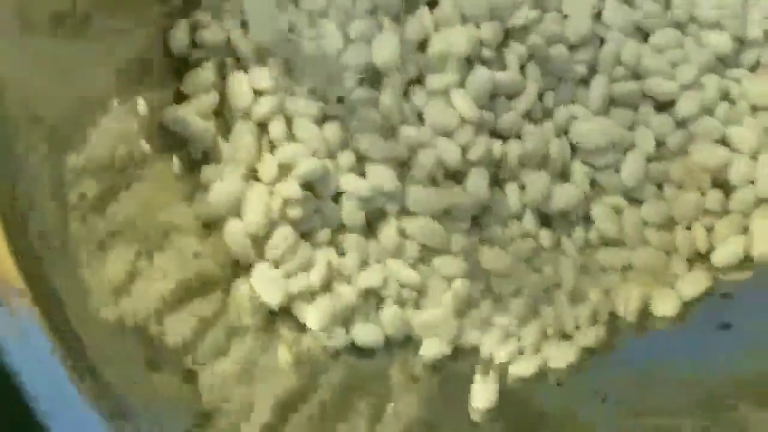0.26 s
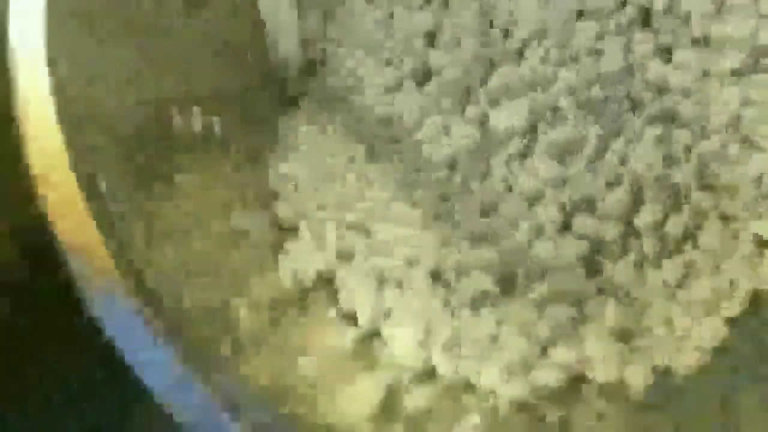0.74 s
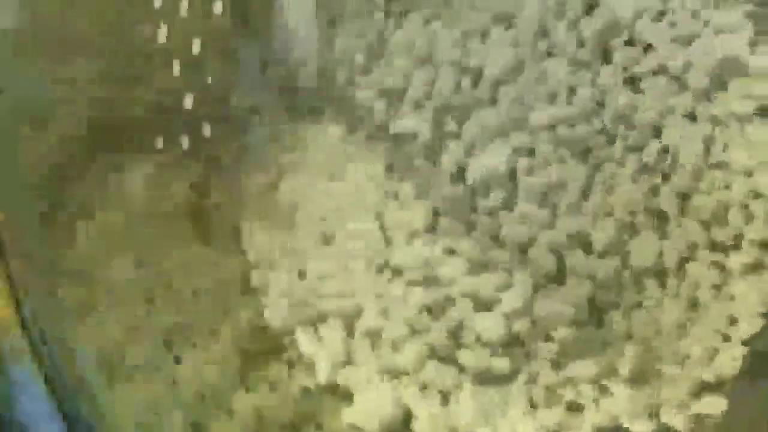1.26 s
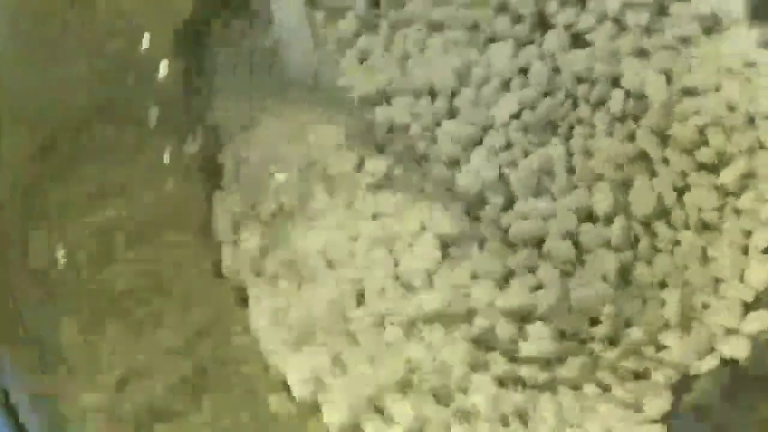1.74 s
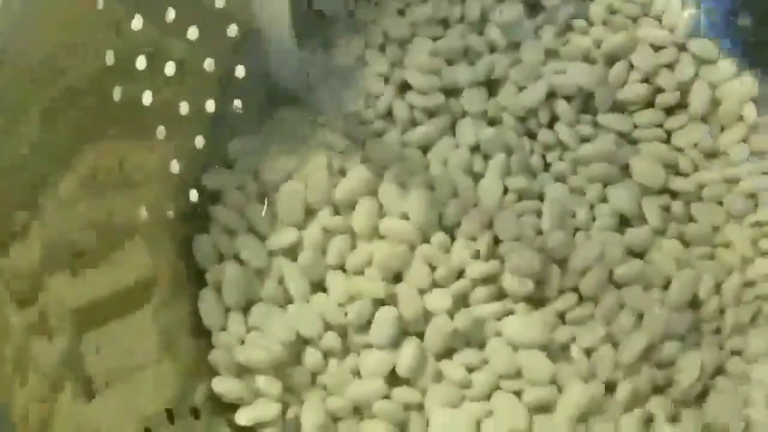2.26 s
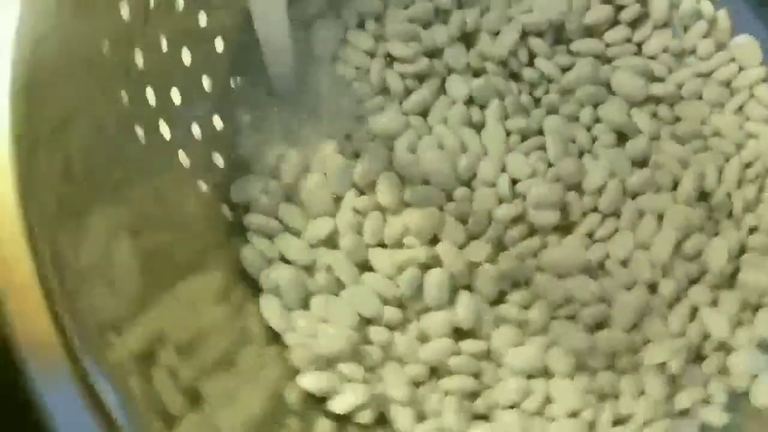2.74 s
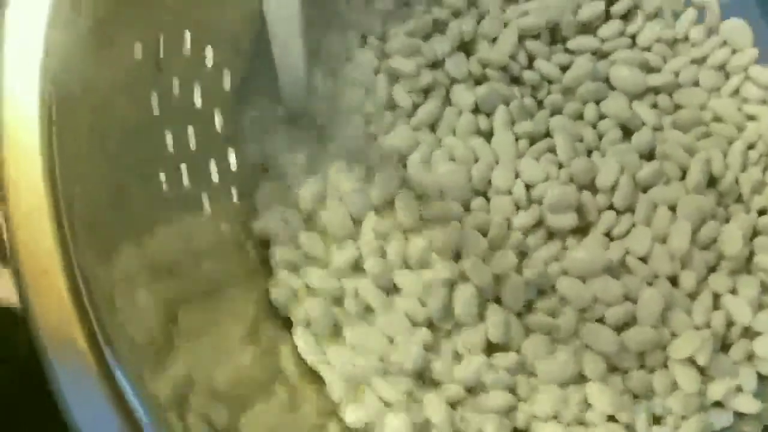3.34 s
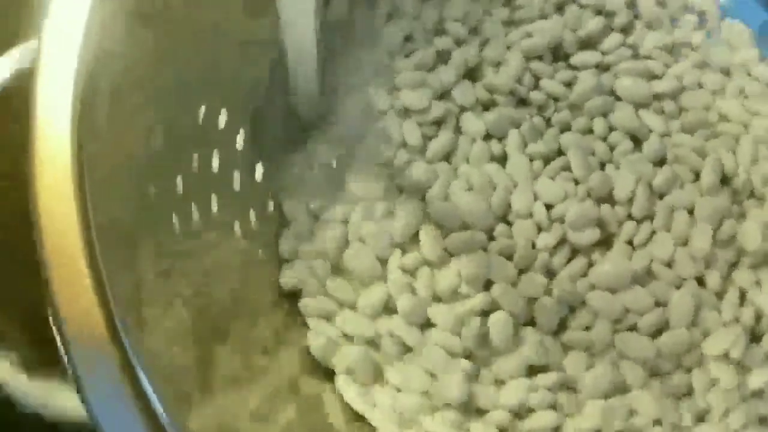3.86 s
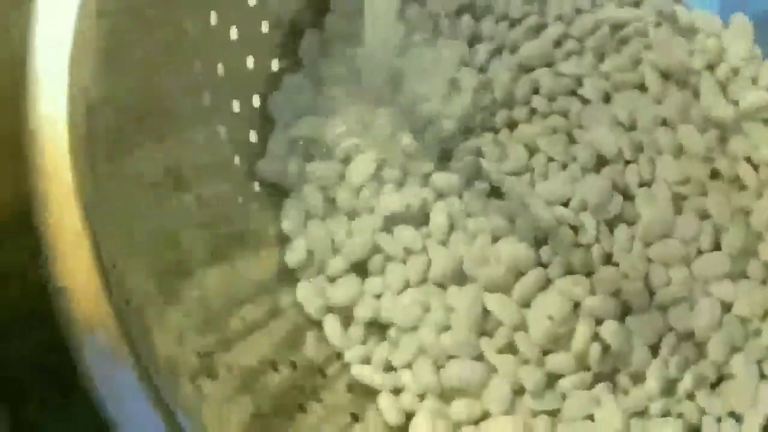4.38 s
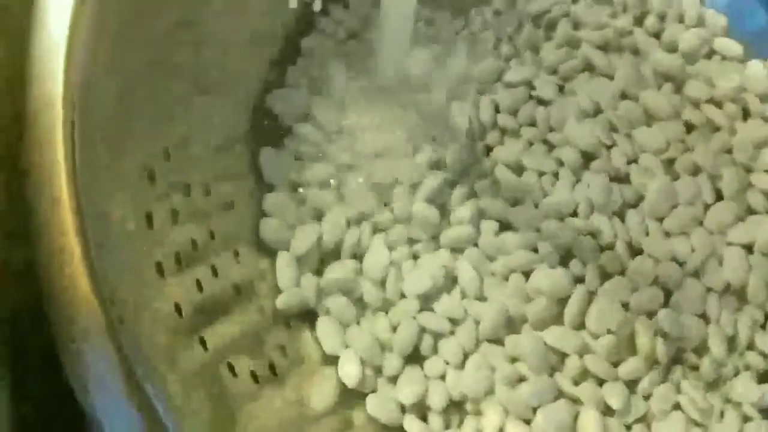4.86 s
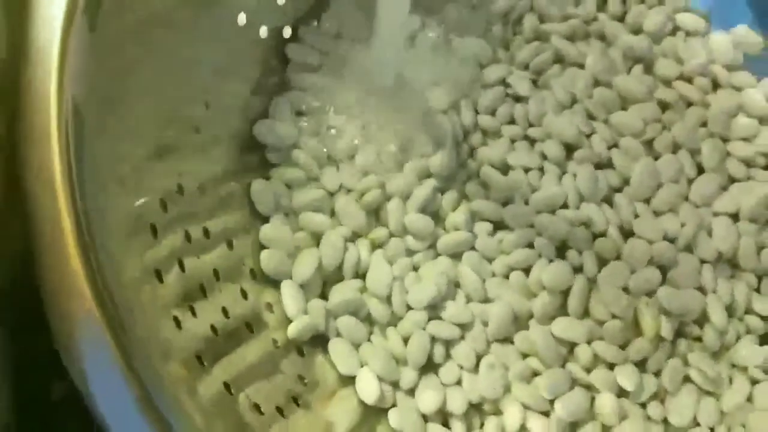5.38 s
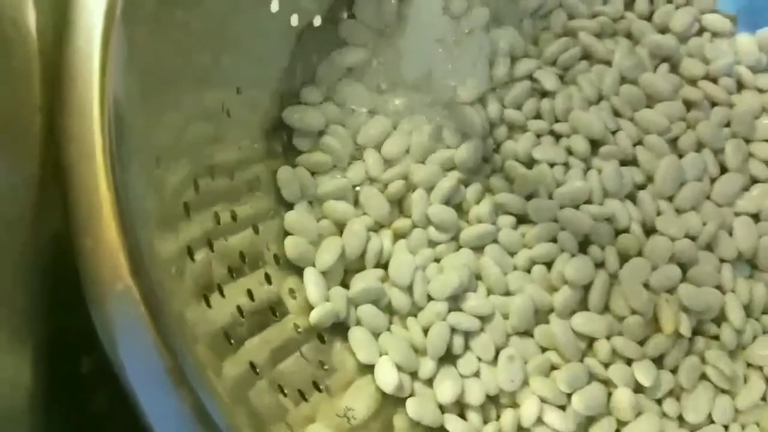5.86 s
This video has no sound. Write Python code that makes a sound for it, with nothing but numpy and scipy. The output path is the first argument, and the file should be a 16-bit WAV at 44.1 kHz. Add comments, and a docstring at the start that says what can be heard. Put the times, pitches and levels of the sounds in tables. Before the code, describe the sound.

Water runs without stopping, bright and fizzy, gurgling among beans and drumming faintly on a steel basin below. The colander is first jolted four times, thudding and ringing dully as beans rattle, then scraped round in a quick stuttering bump. Lighter taps and another brief groan follow, with small low plops and one clear late knock. Close stereo pickup in a small, slightly reverberant kitchen.

```python
"""Tap water runs onto dried beans in a steel colander held over a kitchen sink, close to the microphones.
From the start, droplet impacts, ringing bubbles and noise make the jet; run-off drums on basin modes.
Then the colander is shaken four times: its bumps excite modes of sink, foot and wall and rattle the beans.
Sliding beans are swishes of clicks, and short low plops are tones of a few cycles with rising pitch.
Later the colander is dragged round: knocks mingle with stick-slip judders of its foot as the water runs on."""
import sys
import numpy as np
from scipy import signal
from scipy.fft import rfft, irfft
from scipy.io import wavfile
from scipy.ndimage import uniform_filter1d

SR = 44100
rng = np.random.default_rng(int(sys.argv[2]) if len(sys.argv) > 2 else 0)


def to_wav(s):
    """Save 16-bit WAV."""
    ch = np.atleast_2d(s).T  # columns
    pcm = np.round(np.clip(ch, -1, 1) * 32767)  # PCM
    wavfile.write(sys.argv[1], SR, pcm.astype(np.int16))


N = 269892
TIME = np.arange(N) / SR
HZ = np.fft.rfftfreq(N, 1 / SR)

# The jet on the beans, quietest while the colander is tipped away.
# Each row: time in seconds, splash level in dB, fine spray level in dB.
JET_LEVELS = [(0.0, -33, -35), (0.6, -32, -35.5), (0.82, -31, -36.5), (0.95, -30, -36), (1.08, -32.5, -36),
              (1.5, -34, -38.5), (1.72, -33.5, -37.5), (1.88, -36, -41), (2.12, -35.5, -39),
              (2.38, -33, -36.5), (2.75, -33.5, -36.5), (2.921, -34.5, -38.5), (3.45, -34, -38),
              (3.85, -31, -36), (4.25, -31.5, -36), (4.6, -33.5, -33), (4.78, -34.5, -34.5),
              (5.25, -34.5, -36.5), (6.11, -32.5, -37)]
# Spectral colour of the running water. Each row: frequency in Hz, relative density in dB per Hz.
WATER_COLOUR = [(40, -21), (100, -15), (330, -10), (470, -22), (1100, -21.5), (1900, -6), (2300, -6),
                (2650, -3.5), (3600, -4), (6500, 0), (8700, 1), (10500, 8), (12800, 10), (14000, 7),
                (15000, 6), (15700, 6)]
# Air resonances of the bowl and its holes, added to that colour.
# Each row: frequency in Hz, width in Hz, height in dB.
BOWL_RESONANCES = [(455, 54, -6), (581, 110, 9), (680, 74, -11.5), (786, 49, 4.5), (960, 47, 5.5),
                   (1410, 31, 6.5), (1316, 42, 10), (1683, 45, 7), (2160, 130, 3), (3090, 130, 5),
                   (3555, 520, 4.5), (4130, 190, 3.5), (11700, 400, 3), (13140, 3700, 7.5)]
# Water welling between the beans, fuller once the jet has dug a pool.
# Each row: time in seconds, mean level in dB.
GURGLE_LEVELS = [(0.0, -50), (0.6, -50), (1.3, -47), (1.9, -50), (2.4, -48.5), (3.5, -47), (4.2, -45),
                 (6.11, -47)]
# The jet wanders across the bowl. Each row: time in seconds, left minus right in dB.
JET_PAN = [(0.0, -1.2), (0.8, -0.5), (1.7, 0.3), (2.7, 1.5), (3.7, 0.5), (4.25, -0.5), (4.7, -1.5),
           (5.25, 0.2), (6.11, -2.2)]
# The jet sings on the steel when it strikes the wall beside the heap.
# Each row: time in seconds, mean level in dB.
WALL_SING_LEVELS = [(0.0, -47), (0.95, -44.5), (1.5, -57.5), (2.3, -44.5), (2.8, -45), (3.3, -40.5),
                    (3.9, -48), (4.4, -51), (6.11, -50)]
# Resonances of that singing. Each row: frequency in Hz, width in Hz, relative level in dB.
WALL_SING_PEAKS = [(3200, 210, -8), (3463, 170, 1), (3760, 110, 2.5), (3990, 58, 5)]
# The froth sizzles higher once the jet stays in its pool. Each row: time in seconds, mean level in dB.
SIZZLE_LEVELS = [(0.0, -53), (1.5, -66), (3.0, -48), (4.3, -48), (4.8, -41), (5.3, -40.5), (6.11, -41)]
# Resonances of the sizzle. Each row: frequency in Hz, width in Hz, relative level in dB.
SIZZLE_PEAKS = [(11400, 300, -11), (12260, 580, 7), (12500, 640, 7)]
# Modes of the steel sink with the colander on it.
# Each row: frequency in Hz, relative level in dB, decay by 60 dB in seconds.
SINK_MODES = [(90, -7, 0.048), (120.6, 1, 0.17), (175, -9.5, 0.19), (188.2, -8.5, 0.31),
              (258.7, -3.5, 0.18), (315.3, -3, 0.19), (329, -12.5, 0.53), (355, -30, 0.39),
              (401, -16, 0.43), (558, -23.5, 0.34), (601, -16, 0.11), (640, -12.5, 0.14), (742, -10, 0.17),
              (874, -15, 0.15), (1117, -21, 0.22), (1205, -17, 0.075), (1310, -8.5, 0.09),
              (1610, -18.5, 0.15), (1803, -20, 0.09), (2150, -10.5, 0.079), (2410, -16, 0.11)]
# Brief level dips between about 400 and 1400 Hz.
# Each row: time of the deepest point in seconds, half length in seconds, change in dB.
LEVEL_DIPS = [(0.348, 0.04, -12), (0.91, 0.018, -12), (1.385, 0.018, -11), (1.462, 0.025, -14),
              (3.87, 0.064, -28), (4.068, 0.014, -9), (5.995, 0.035, -8)]
# The colander bumps the sink. Each row: start in seconds, thud drive in dB, contact hardness (low-pass
# edge) in Hz, ring pitch of the foot in Hz, ring drive in dB, drive of the wall's clink in dB.
KNOCKS = [(0.729, -14.5, 2800, 319, -16, -24), (1.007, -15.5, 1700, 324, -19, -43),
          (1.017, -27, 500, 344, -18, -41), (1.277, -14.5, 2560, 293, -47, -23),
          (1.313, -20.5, 2040, 342, -12, -36), (1.584, -20.5, 1390, 309, -25, -31),
          (1.605, -33, 1500, 590, -23, -27), (2.225, -28.5, 1170, 310, -9, -25),
          (2.333, -21, 750, 188, -32, -35), (2.351, -26, 1000, 303, -19, -36),
          (2.396, -21.5, 1300, 320, -27, -29), (2.432, -25.5, 895, 292, -25, -35),
          (2.549, -46, 600, 326, -24.5, -50), (2.602, -32, 619, 259, -19.5, -30),
          (2.804, -33.5, 383, 296, -24, -55), (2.895, -43.5, 500, 323, -37, -52),
          (3.1, -33.5, 1040, 249, -17, -25.5), (3.194, -37.5, 700, 280, -26, -32.5),
          (3.472, -42, 600, 328, -33.5, -41), (3.997, -40, 600, 398, -29, -36),
          (4.25, -37, 800, 311.5, -21.5, -36), (4.58, -43, 1200, 580, -31, -34.5),
          (4.887, -27, 1700, 305, -13.5, -20.5), (5.322, -33.5, 700, 299.5, -17.5, -29.5)]
# Modes of the colander's foot.
# Each row: multiple of its ring pitch, relative level in dB, decay by 60 dB in seconds.
FOOT_MODES = [(0.5, -1.5, 0.088), (1.001, 1, 0.11), (2.32, -10.5, 0.08)]
# Modes of the colander's thin wall, damped by wet beans.
# Each row: mean frequency in Hz, relative level in dB, decay by 60 dB in seconds.
WALL_MODES = [(1030, -9.5, 0.12), (1263, -4.5, 0.051), (1580, -19, 0.045), (1750, -6, 0.15),
              (1900, -5, 0.066), (2230, -15, 0.037), (2810, -5, 0.037), (3040, -26, 0.022),
              (3750, 1, 0.051)]
# Colour of wet beans thrown against the steel. Each row: frequency in Hz, relative density in dB per Hz.
RATTLE_COLOUR = [(30, -24), (150, 20), (600, 12), (1000, 2), (1400, 6.5), (2500, 5.5), (4000, -2),
                 (6200, 9), (8500, -6), (15000, -4)]
# Beans slide over each other and the perforated steel.
# Each row: time of the peak in seconds, half length in seconds, centre in Hz, peak level in dB.
SLIDES = [(0.753, 0.032, 5870, -27.5), (1.022, 0.025, 5530, -30.5), (1.236, 0.013, 2170, -38),
          (1.283, 0.024, 4960, -28.5), (1.315, 0.018, 5800, -28), (2.419, 0.0053, 5800, -29),
          (3.83, 0.02, 5500, -30.5), (4.608, 0.073, 5900, -32.5), (4.889, 0.012, 4460, -27),
          (5.006, 0.032, 4400, -31), (5.74, 0.015, 6000, -31.5), (5.874, 0.01, 5800, -32)]
# Short low plops: splashes ring the bowl for a few cycles.
# Each row: start in seconds, initial pitch in Hz, level in dB.
LOW_PLOPS = [(0.85, 880, -44), (4.075, 1400, -48), (4.11, 1110, -39), (4.31, 640, -41), (4.662, 564, -42.5),
             (4.824, 600, -38.5), (5.03, 588, -40)]
# The foot sticks and slips as it is dragged. Each row: start in seconds, length in seconds,
# mean slip rate at first in Hz, mean slip rate at last in Hz, drive in dB.
JUDDERS = [(2.278, 0.041, 321, 316, -33), (2.334, 0.041, 97, 200, -20), (2.348, 0.0097, 690, 640, -26),
           (2.361, 0.03, 298, 326, -16.5), (2.406, 0.03, 305, 327, -20.5), (2.455, 0.048, 273, 225, -35.5),
           (2.39, 0.008, 620, 628, -25), (4.081, 0.048, 151, 173, -32.5), (4.107, 0.0094, 516, 595, -20.5),
           (4.15, 0.048, 173, 171, -37.5), (4.256, 0.039, 302, 328, -23)]
# Difference between the microphones. Each row: frequency in Hz, left minus right in dB.
BALANCE = [(100, 1), (300, -2), (650, 1.5), (1200, -1.5), (2600, 3), (5000, 3), (9000, 0.3), (13000, 2)]

# stronger and harder bumps throw more beans: level at a 0 dB thud of RATTLE_HARD_HZ, and its slopes
RATTLE_DB, RATTLE_HARD_HZ, RATTLE_DB_PER_DB, RATTLE_DB_PER_OCTAVE = -10.5, 980, 1, 1
# each contact first shoves the basin floor: time scale, and drive against the thud
SHOVE_S, SHOVE_DB = 0.00097, -9
# linear rise and exponential fall of every judder
JUDDER_ATTACK_S, JUDDER_RELEASE_S = 0.01, 0.0075
# beans chatter against the steel while the foot judders: level against its drive, and centre
CHATTER_DB, CHATTER_HZ = -20, 800
EDGE_HZ = 15600  # upper band limit


def gain_of(db):
    """Logarithmic level: decibels become an amplitude ratio."""
    return 10 ** (np.asarray(db) / 20)


def evened(x):
    """Normalisation of mean power: scales to rms 1."""
    return x / np.sqrt(np.mean(x ** 2) + 1e-20)


def read(points):
    """Spectral interpolation: joins table points by straight lines on a log-frequency axis."""
    f, value = np.transpose(points)
    return np.interp(np.log(HZ + 1), np.log(f + 1), value)


def follow_points(points):
    """Linear interpolation: joins table points in time."""
    return np.interp(TIME, *np.transpose(points))


def shaped(x, gain):
    """Linear filtering: multiplies the spectrum of a full-length sound by a gain."""
    return irfft(rfft(x) * gain, N)


def softened(x, edge_hz):
    """Contact compliance: a soft contact leaves out the treble, as a second-order low-pass."""
    return signal.lfilter(*signal.butter(2, min(edge_hz, SR / 3), fs=SR), x)


def add(mix, s, sound):
    """Superposition: adds a sound into the mix at time s."""
    part = mix[max(round(s * SR), 0):][:len(sound)]
    part += sound[:len(part)]


def waver(rate_hz):
    """Random fluctuation: low-passed noise of rms 1, mostly slower than rate_hz."""
    return evened(shaped(rng.standard_normal(N), 1 / (1 + (HZ / rate_hz) ** 2)))


def patter(per_s, spread_db):
    """Random impact process: two channels of tiny clicks with exponentially spread levels in dB."""
    size = gain_of(spread_db * np.minimum(rng.exponential(1, (2, N)), 5))
    sign = rng.choice([-1, 1], (2, N))
    struck = rng.random((2, N)) < per_s / SR
    return evened(size * sign * struck)


def clumped(clicks, depth_db=1.5):
    """Amplitude modulation: beans strike in small bunches a few milliseconds long."""
    return clicks * gain_of(depth_db * waver(rate_hz=160))


def swish(hz, width_octaves=1.0):
    """Band-limited impact noise: many small clicks in one band."""
    band = np.exp(-(np.log2((HZ + 1) / hz) / width_octaves) ** 2)
    return evened(shaped(clumped(patter(per_s=4000, spread_db=-0.5)), band))


def sloshed(x, sway_s=0.0001, rate_hz=10):
    """Frequency modulation by varying delay: shifting water and beans make the steel's ring wander."""
    warped = TIME + sway_s * waver(rate_hz)
    return np.array([np.interp(warped, TIME, side) for side in x])


def reflections(x, t60, per_s):
    """Sparse reverberation: decaying echoes at random delays, different on each side."""
    t = TIME[:SR // 2]
    sign = rng.choice([-1, 1], (2, len(t)))
    taps = sign * (rng.random((2, len(t))) < per_s / SR) * gain_of(-60 * t / t60)
    taps = taps / np.linalg.norm(taps, axis=1, keepdims=True)
    return signal.oaconvolve(x, taps, axes=1)[:, :N]


def bubbles(low_hz, high_hz, per_s, cycles, glide, spread_db, count=32):
    """Bubble resonance: air pockets between the beans ring briefly, rising in pitch as they surface."""
    out = np.zeros((2, N))
    for hz in np.geomspace(low_hz, high_hz, count) * rng.uniform(0.94, 1.04, count):
        # age counts decay constants, each lasting the given number of cycles
        age = np.arange(int(5 * cycles / hz * SR)) * hz / (cycles * SR)
        ping = np.exp(-age) * np.sin(2 * np.pi * cycles * age * (1 + glide * age))
        rung = signal.oaconvolve(patter(per_s, spread_db), ping[None], axes=1)[:, :N]
        out += np.sqrt(hz) * evened(rung)
    return evened(out)


def patches(span_s, width_hz, size):
    """Correlated randomness: a smooth field of rms 1, frequency bins by time frames."""
    field = rng.standard_normal((size // 2 + 1, N // (size // 4) + 8))
    frames, bins = span_s * SR * 4 / size, width_hz * size / SR
    for axis, reach in ((1, frames), (0, bins)) * 2:  # averaged twice each way
        field = uniform_filter1d(field, max(round(reach), 1), axis)
    return evened(field)


def churned(x, low_db=7.0, high_db=3.0, knee_hz=1500, size=1024):
    """Time-varying filtering: as pockets fill and empty, narrow bands swell and fade, most in the bass."""
    overlap = size - size // 4
    hz, _, z = signal.stft(x, SR, nperseg=size, noverlap=overlap)
    depth = high_db + (low_db - high_db) / (1 + (hz / knee_hz) ** 4)
    field = np.minimum(patches(span_s=.03, width_hz=130, size=size), 1.4)
    swell = gain_of(depth[:, None] * field[:, :z.shape[-1]])
    swell /= np.sqrt(np.mean(swell ** 2, axis=1, keepdims=True))
    return signal.istft(z * swell, SR, nperseg=size, noverlap=overlap)[1][:, :N]


def jet(gurgle_hz=1300, spray_hz=8500):
    """Impact noise and bubble resonance: ticks, bubbles and hiss surge, coloured by the bowl."""
    s, splash_db, spray_db = np.transpose(JET_LEVELS)
    drops = patter(per_s=7000, spread_db=-0.5)
    froth = bubbles(low_hz=1207, high_hz=11900, per_s=35, cycles=7.4, glide=0.011, spread_db=2.5)
    hiss = rng.standard_normal((2, N))
    water = drops + gain_of(-10.5) * froth + gain_of(-3.5) * hiss
    # the jet lands a little to the left: a faint copy of the left reaches the right 9 samples later
    water[1, 9:] += .13 * water[0, :-9]
    # the bowl's walls echo it
    echoes = softened(reflections(water, t60=.1, per_s=3000), 2500)
    water = churned(water + gain_of(-3) * echoes)

    bowl_db = sum(db / (1 + (2 * (HZ - hz) / width) ** 2) for hz, width, db in BOWL_RESONANCES)
    colour = gain_of(read(WATER_COLOUR) + bowl_db)
    low = 1 / (1 + (HZ / gurgle_hz) ** 12)
    high = 1 - 1 / (1 + (HZ / spray_hz) ** 8)
    surge = waver(rate_hz=15.0)  # shared by splash and spray

    # larger air pockets sound one by one between the beans
    pockets = bubbles(low_hz=481, high_hz=1548, per_s=7, cycles=8.3, glide=0.015, spread_db=1.3, count=16)
    welling = evened(shaped(water, colour * low)) + gain_of(-2.5) * evened(shaped(pockets, colour * low))
    gurgle = evened(churned(welling, low_db=7.0))
    gurgle = gurgle * gain_of(follow_points(GURGLE_LEVELS) + 1.1 * waver(rate_hz=9.7))
    splash = evened(shaped(water, colour * (1 - low - high)))
    splash = splash * gain_of(np.interp(TIME, s, splash_db) + 0.31 * surge)
    spray = evened(shaped(water, colour * high))
    spray = spray * gain_of(np.interp(TIME, s, spray_db) + 0.5 * surge)
    return gurgle + splash + spray


def splats(level_db=-55, per_s=24, fade_s=0.012, centre_hz=1250):
    """Impulsive noise bursts: blobs of water slap the beans, sudden, short and of uneven size."""
    starts = np.abs(patter(per_s=per_s, spread_db=3.8)[0])
    fading = signal.lfilter([1], [1, -np.exp(-1 / (fade_s * SR))], starts)
    envelope = evened(fading)
    s, gurgle_db = np.transpose(GURGLE_LEVELS)
    course_db = level_db + np.interp(TIME, s, gurgle_db - gurgle_db.mean())
    return gain_of(course_db) * envelope * swish(centre_hz, width_octaves=1.3)


def singing(levels, peaks, flutter_db=0.5):
    """Resonance under random excitation: droplets keep peaks ringing that drift as the water shifts."""
    gain = sum(gain_of(db) / (1 + (2 * (HZ - hz) / width) ** 2) for hz, width, db in peaks)
    excited = shaped(patter(per_s=3500, spread_db=0.5), gain)
    ring = sloshed(excited, sway_s=0.000198, rate_hz=3.64)
    return evened(ring) * gain_of(follow_points(levels) + flutter_db * waver(rate_hz=24))


def sink(force, apart_hz=650):
    """Modal superposition: basin modes swell within a cycle, the higher ones out of step at the sides."""
    t, ring = TIME[:SR], 0
    for hz, db, t60 in SINK_MODES:
        skew = np.array([[1], [-1]]) * np.pi / 4 * min((hz / apart_hz) ** 2, 1)
        swell = 1 - np.exp(-2 * t * hz)
        ring = ring + gain_of(db - 60 * t / t60) * swell * np.sin(2 * np.pi * hz * t + skew)
    return signal.oaconvolve(force[None], ring, axes=1)[:, :N]


def runoff(level_db=-55, soft_hz=170, follow=0.96, wobble_db=3.5):
    """Forced modal vibration: uneven strands drum on the basin, harder when the jet splashes more."""
    s, splash_db, _ = np.transpose(JET_LEVELS)
    flow_db = follow * np.interp(TIME, s, splash_db - splash_db.mean()) + wobble_db * waver(rate_hz=54)
    drips = patter(per_s=310, spread_db=3.5)[0] * gain_of(flow_db)
    return gain_of(level_db) * evened(sink(softened(drips, soft_hz)))


def dipped(x, centre_hz=780, octaves=0.95):
    """Time-varying band rejection: the level dips briefly between about 400 and 1400 Hz."""
    dip_db = sum(db * np.exp(-((TIME - s) / half) ** 4) for s, half, db in LEVEL_DIPS)
    band = np.exp(-(np.log2((HZ + 1) / centre_hz) / octaves) ** 6)
    return x - (1 - gain_of(dip_db)) * shaped(x, band)


def clink(detune=0.0093, apart=0.94):
    """Modal decay: the wall's short ring varies with each strike in pitch, and by side in phase."""
    t, ring = TIME[:SR // 8], 0
    for (hz, db, t60), chance in zip(WALL_MODES, rng.standard_normal((len(WALL_MODES), 3))):
        pitch_hz = hz * (1 + detune * chance[0])
        phase = apart * chance[1:, None]  # radians, one for each side
        ring = ring + gain_of(db - 60 * t / t60) * np.sin(2 * np.pi * pitch_hz * t + phase)
    return ring / 2


def knocks(ring_rise=0.019, lag=0.0016, lead=0.011, settle=0.031,
           rebound_s=0.0143, rebound_db=-5, rebound_hz=160, shove_lag=0.0011):
    """Impact excitation: bumps shove and thud the sink, ring foot and wall, and throw beans."""
    force, foot, shake, shove = np.zeros((4, N))
    clinks, t = np.zeros((2, N)), TIME[:SR // 2]
    tap = signal.unit_impulse(len(t))
    u = (t - shove_lag) / SHOVE_S
    push = 2 * u * np.exp(1 - u ** 2) * np.minimum(t / SHOVE_S, 1)
    for s, thud_db, hard_hz, ring_hz, ring_db, clink_db in KNOCKS:
        add(force, s, gain_of(thud_db) * softened(tap, hard_hz))
        add(shove, s, gain_of(thud_db + SHOVE_DB) * push)
        # the wet mass of beans swings back a moment later, softly
        add(force, s + rebound_s, -gain_of(thud_db + rebound_db) * softened(tap, rebound_hz))
        ring = sum(gain_of(db - 60 * t / t60) * np.sin(2 * np.pi * multiple * ring_hz * t)
                   for multiple, db, t60 in FOOT_MODES)
        add(foot, s, gain_of(ring_db) * (1 - np.exp(-t / ring_rise)) * ring)
        for side, sound in zip(clinks, clink()):
            add(side, s, gain_of(clink_db) * sound)
        # the beans' rattle grows up to a peak just after the bump, then settles
        hardness_db = RATTLE_DB_PER_OCTAVE * np.log2(hard_hz / RATTLE_HARD_HZ)
        power = gain_of(RATTLE_DB + RATTLE_DB_PER_DB * thud_db + hardness_db) ** 2
        shake += power * np.exp(-2 * np.maximum((s + lag - TIME) / lead, (TIME - s - lag) / settle))
    clicks = clumped(patter(per_s=2500, spread_db=3.0))
    beans = evened(shaped(clicks, gain_of(read(RATTLE_COLOUR))))
    return sloshed(sink(force) + foot) + shove + clinks + np.sqrt(shake) * beans


def slides():
    """Granular friction: brief swishes of sliding beans, several with the shakes and bumps."""
    return sum(gain_of(db) * np.exp(-((TIME - s) / half) ** 2) * swish(hz) for s, half, hz, db in SLIDES)


def low_plops(swell_s=0.0046, glide=0.98):
    """Transient resonance: splashes ring the bowl for a few cycles, the pitch rising slightly."""
    out, t = np.zeros(N), TIME[:SR // 10]
    envelope = t / swell_s * np.exp(1 - t / swell_s)
    for s, hz, db in LOW_PLOPS:
        add(out, s, gain_of(db) * envelope * np.sin(2 * np.pi * hz * t * (1 + glide * t)))
    return out


def judders(overtone_db=-27, rough_db=0.5, basin_db=-55, sag_db_per_s=20):
    """Stick-slip friction: short unsteady groans shake the beans and leave the basin ringing."""
    groan, drag, t = np.zeros(N), np.zeros(N), TIME[:SR // 2]
    pitch = 1 + .015 * waver(rate_hz=80)
    for s, length, first_hz, last_hz, db in JUDDERS:
        hz = np.interp(t, [0, length], [first_hz, last_hz])
        turn = 2 * np.pi * np.cumsum(hz * pitch[int(s * SR):][:len(t)]) / SR
        # each harmonic is weaker than the last by overtone_db
        slip = sum(gain_of(overtone_db * k) * np.sin((k + 1) * turn) for k in range(4))
        after = np.maximum(t - length, 0)
        release = np.exp(-after / JUDDER_RELEASE_S)
        level = gain_of(db - sag_db_per_s * t) * np.minimum(t / JUDDER_ATTACK_S, 1) * release
        add(groan, s, level * slip)
        add(drag, s, level)
    groan = groan * gain_of(rough_db * waver(rate_hz=250))
    basin = gain_of(basin_db) * sloshed(sink(groan))
    chatter = gain_of(CHATTER_DB) * drag * swish(CHATTER_HZ, width_octaves=3.4)
    return groan + basin + chatter


def scene():
    """Superposition of sources: water and handling noises in a small kitchen."""
    handling = knocks() + judders()
    room = gain_of(-14.5) * reflections(handling, t60=0.29, per_s=3500)
    wall_song = singing(WALL_SING_LEVELS, WALL_SING_PEAKS)
    sizzle = singing(SIZZLE_LEVELS, SIZZLE_PEAKS)
    water = jet() + splats() + wall_song + sizzle
    water = water * gain_of(np.array([[.5], [-.5]]) * follow_points(JET_PAN))
    return dipped(water + runoff()) + low_plops() + slides() + handling + room


def record(dry, low_cut_hz=56):
    """Transducer response: two microphones differ in colour, lose the deep bass and are band-limited."""
    heard = shaped(dry, gain_of(np.array([[.5], [-.5]]) * read(BALANCE)))
    heard = signal.sosfilt(signal.butter(2, low_cut_hz, "high", fs=SR, output="sos"), heard)
    band_limit = signal.firwin(511, EDGE_HZ, window=("kaiser", 9), fs=SR)
    return signal.oaconvolve(heard, band_limit[None], "same")


dry = scene()
out = record(dry)
to_wav(out)
```